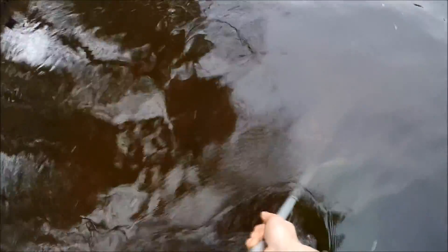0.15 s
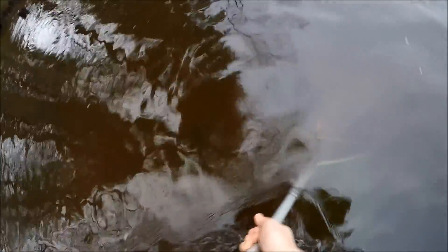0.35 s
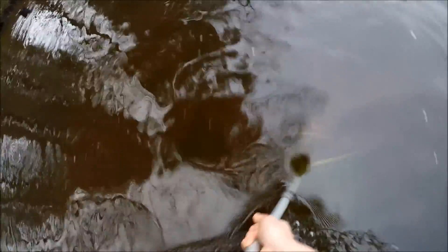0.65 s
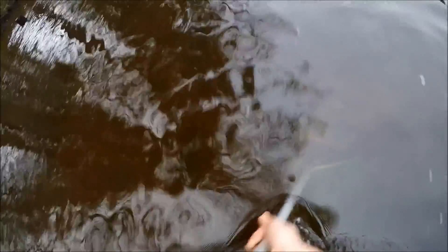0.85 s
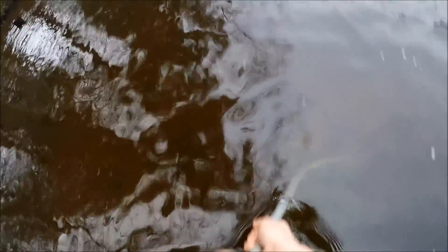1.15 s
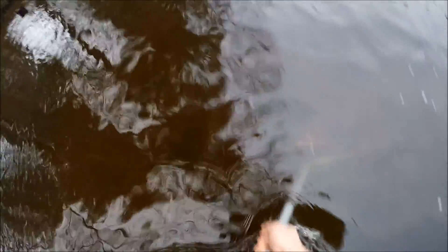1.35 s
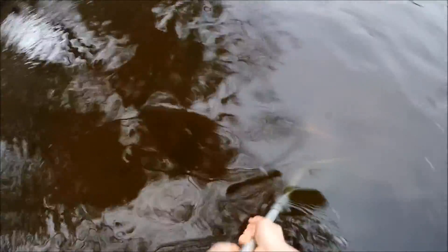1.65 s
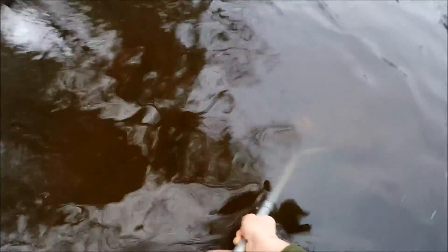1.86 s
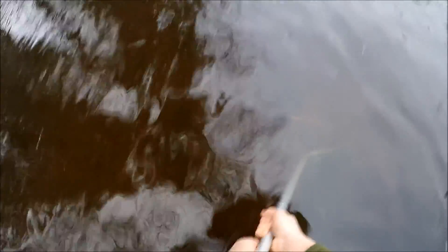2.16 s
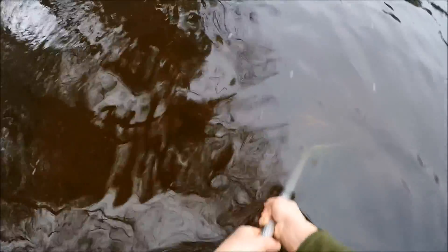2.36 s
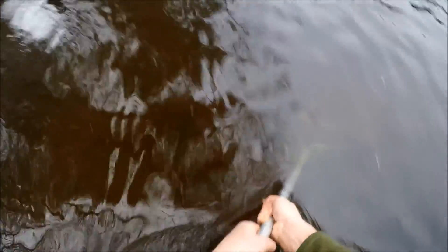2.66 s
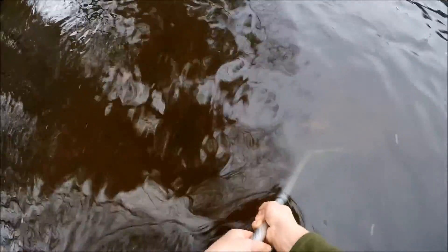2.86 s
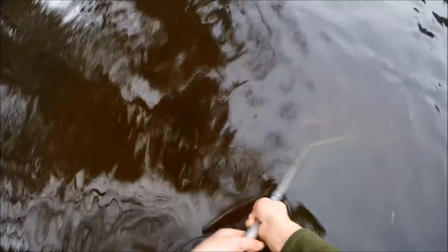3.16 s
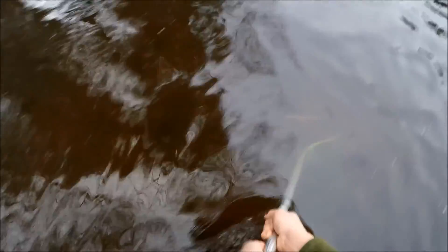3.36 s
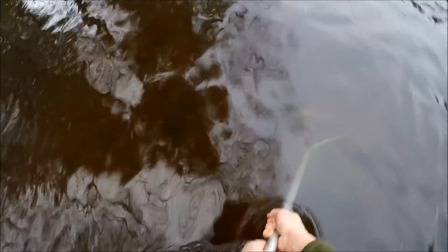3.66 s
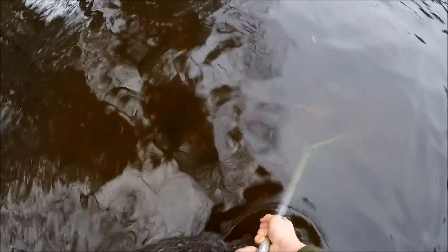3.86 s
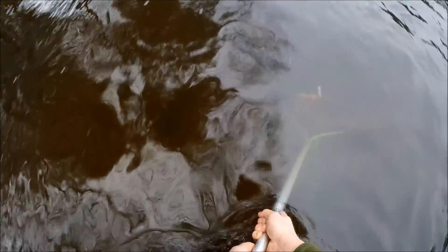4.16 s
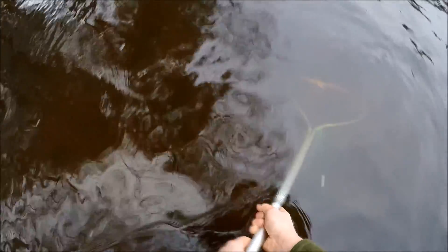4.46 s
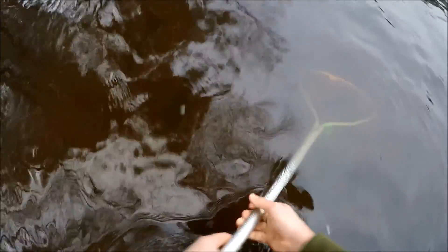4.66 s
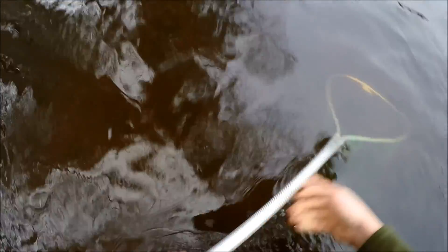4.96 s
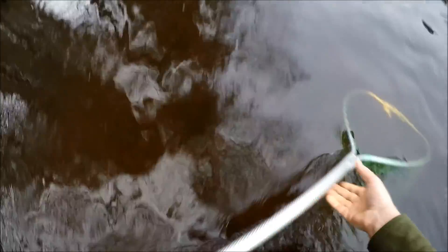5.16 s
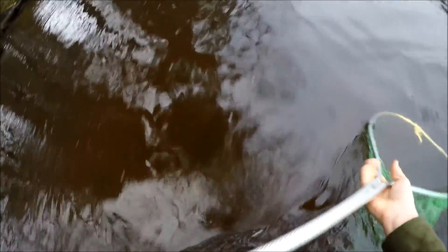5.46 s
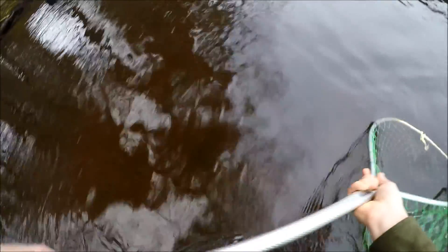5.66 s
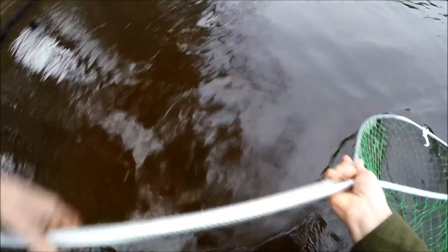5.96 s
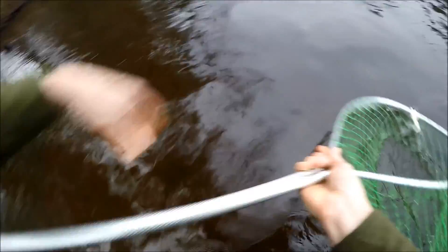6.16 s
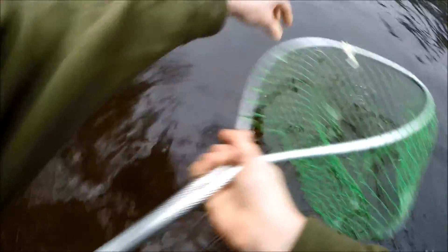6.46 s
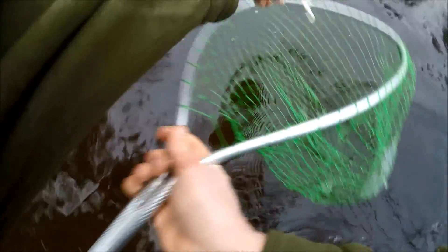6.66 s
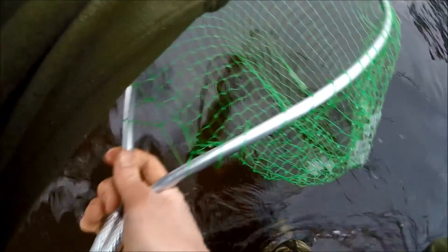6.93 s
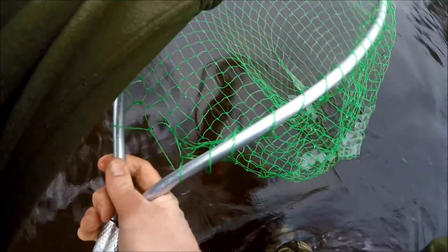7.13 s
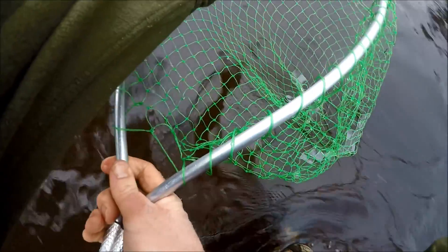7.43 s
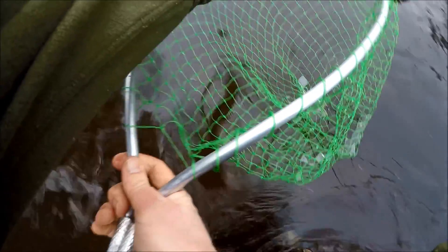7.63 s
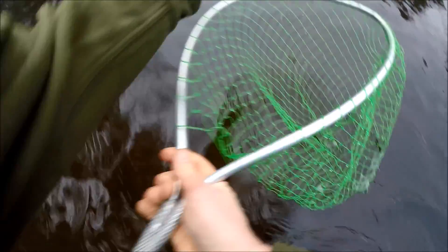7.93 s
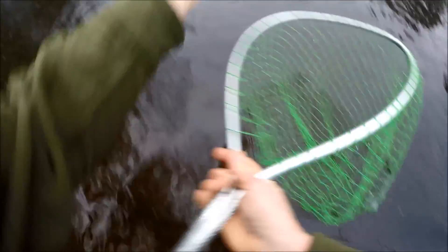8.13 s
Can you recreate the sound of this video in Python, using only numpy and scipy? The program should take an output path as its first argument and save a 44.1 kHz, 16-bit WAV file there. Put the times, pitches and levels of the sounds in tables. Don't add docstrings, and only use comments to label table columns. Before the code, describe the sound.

Very close, boxy handling noise from a sealed microphone on a wading person's chest. Jerky cloth scuffs, crisp snaps, drip taps and tiny ticks come first over low swaying rumble and dull thumps. It thins out, a far bird gives three faint whistles, then knocks cluster as the net is lifted, and a heavy fabric rub follows. It quiets to soft rubbing before final bumps. Soft hiss throughout.

```python
import sys
import numpy as np
from scipy import signal
from scipy.fft import rfft, irfft
from scipy.io import wavfile
from scipy.ndimage import uniform_filter1d

SR = 44100
rng = np.random.default_rng(int(sys.argv[2]) if len(sys.argv) > 2 else 0)


def digitize_waveform(pressure):
    field = np.atleast_2d(pressure).T
    bounded = np.clip(field, -1, 1)
    quanta = np.round(bounded * 32767).astype(np.int16)
    wavfile.write(sys.argv[1], SR, quanta)


def voltage_ratio(level):
    return 10 ** (np.asarray(level, float) / 20)


N = 365677

# (frequency [Hz], level [dB per Hz])
HISS_SPECTRUM = [(35, -4.5), (70, -9), (200, -18.5), (1000, -30.5), (2090, -29.5), (3570, -30), (8820, -39),
                 (15400, -40)]
# (frequency [Hz], level [dB])
WHINES = [(12227, -94), (13675, -95)]
# (time [s], pitch [Hz], level [dB])
BIRD_WHISTLES = [
    [(4.035, 3280, -69), (4.115, 3220, -67), (4.145, 3360, -71)],
    [(4.4, 3330, -70), (4.47, 3450, -69), (4.54, 3500, -70)],
    [(4.575, 3420, -61), (4.63, 3370, -64)],
]
# (time [s], peak level [dB], pitch [Hz], length [s])
TICKS = [(0.0474, -28, 6100, 0.0024), (0.396, -37.5, 3980, 0.0026), (0.76, -30.5, 5500, 0.0052),
         (0.78, -25, 4160, 0.0041), (0.937, -35, 4500, 0.0024), (0.989, -38, 5630, 0.0048),
         (1.459, -38.5, 4320, 0.0033), (1.495, -33.5, 4010, 0.0018), (1.7848, -36, 5380, 0.003),
         (2.074, -33.5, 4040, 0.0048), (2.101, -29, 5270, 0.0048), (2.259, -37.5, 5400, 0.0033),
         (2.291, -42, 4800, 0.003), (2.504, -41.5, 5420, 0.0027), (2.834, -38.5, 4080, 0.0023),
         (2.864, -37.5, 5130, 0.001), (2.969, -40, 6200, 0.0022), (3.27, -44, 6840, 0.0022),
         (3.376, -46, 4100, 0.0026), (3.749, -36.5, 4090, 0.003), (3.887, -46, 5370, 0.003),
         (4.868, -38, 4950, 0.0025), (6.62, -35, 4010, 0.003), (7.133, -32, 5030, 0.0011),
         (5.2127, -27, 3250, .0015), (5.957, -41, 5900, .002), (5.963, -40, 4500, .002),
         (6.14, -42, 8000, .002), (6.32, -33, 3100, .003), (7.6013, -37, 4090, .002),
         (8.0228, -36, 3990, .002)]

# (frequency [Hz], width [Hz], level [dB])
CASE_BODY = [(1060, 200, -0.5), (1384, 216, -3), (1680, 385, 1.5), (2287, 470, -5.5), (2548, 303, 2.5),
             (3062, 880, -3.5), (4088, 394, -8)]
CASE_TOP = [(4890, 81, -2), (4950, 820, 2.5), (5555, 170, -0.5), (6015, 640, 0.5), (6680, 620, -4.5),
            (7510, 840, -11)]
CASE_SHEEN = [(9740, 960, -12.5), (10960, 600, -17.5), (13000, 1700, -19)]
# (frequency [Hz], width [Hz], level [dB])
MOUNT_LOW = [(118, 85, -2.5), (165, 120, -11)]
STRAP = [(271.5, 109.5, 3), (315.8, 61, 2.5), (362, 92, -4)]
SHELL = [(551, 90, -3.5), (712.6, 153, -1), (850, 170, -4), (905, 70, -6)]
# (frequency [Hz], width [Hz], level [dB])
BLOWN_SHELL = [(548, 80, -8), (712, 125, 0), (870, 180, -6)]
BLOWN_CASE = [(1093, 210, 0), (1430, 140, -6), (1800, 220, -5.5), (2600, 300, -14)]

# (time [s], jerk [0-1])
JERK = [
    (0, 1.03),
    (3.9, 1),
    (4.5, 0.35),
    (6.0, .6),
    (8.29, .8),
]

# (time [s], peak level [dB], pitch [Hz], shell level [dB])
CRACKLES = [(.016, -26, 2620, -33), (.7475, -28, 2700, -37.5), (0.787, -25.5, 1920, -60),
            (1.0014, -33, 2580, -57), (1.521, -29.5, 3130, -35), (1.5335, -34, 3070, -39),
            (1.5425, -37, 2840, -55), (1.5547, -36, 3000, -55), (1.893, -30, 1730, -40),
            (2.081, -35, 2270, -55), (3.039, -42, 2530, -52)]
# (time [s], peak level [dB], pitch [Hz], shell level [dB])
DRIPS = [(0.4882, -33, 1690, -45), (1.0232, -22, 1910, -32), (1.1251, -23.5, 1840, -33.5),
         (1.2903, -36, 3040, -54), (1.603, -25.5, 1860, -35), (1.6278, -32, 1800, -39),
         (1.688, -24.5, 1810, -38), (1.713, -31.5, 2900, -34.5), (1.8006, -31.5, 2540, -37),
         (2.0286, -40.5, 2170, -65), (2.169, -29, 3110, -47), (2.585, -38, 2500, -42),
         (2.6075, -33.5, 1540, -51), (3.0757, -32.5, 2470, -37), (4.4582, -40.5, 1590, -67),
         (6.902, -21, 2650, -35), (7.2464, -40.5, 2590, -60), (2.731, -40, 2350, -60),
         (4.62, -37, 1450, -60), (5.886, -41, 2700, -60), (6.018, -40, 1500, -55), (6.072, -36, 1600, -55),
         (8.026, -36, 1100, -40)]

# (time [s], low level [dB], pitch [Hz], strap level [dB], shell level [dB])
KNOCKS = [(.072, -29, 134, -50, -50), (1.792, -37, 93, -39.5, -31), (2.153, -46, 72.7, -40, -34.5),
          (2.194, -25.5, 109, -42.5, -63), (2.351, -31.5, 110, -41, -42.5), (2.739, -18, 131, -46, -26.5),
          (3.531, -40, 153, -42.5, -38.5), (3.65, -28.5, 106, -49.5, -58), (4.9345, -22.5, 125, -45.5, -49),
          (4.96, -41, 127, -48, -50), (5.088, -30, 167, -42, -41), (5.112, -33, 101, -50, -42),
          (5.182, -34.5, 110, -56, -42.5), (5.832, -36, 142, -45, -46.5), (5.925, -32, 72.7, -41.5, -40),
          (5.954, -29, 72.7, -47, -44), (5.983, -21.5, 82.5, -50.5, -42.5), (6.35, -32, 119, -40, -27.5),
          (6.388, -25, 137, -30, -25), (6.541, -36, 165, -30.5, -26), (6.586, -26, 91, -49, -40),
          (6.649, -32, 88.8, -42, -43), (6.903, -31, 210, -50, -45), (7.002, -27.5, 119, -51, -66),
          (5.136, -50, 114, -48, -46), (5.148, -40, 140, -52, -47), (5.198, -45, 120, -54, -44),
          (5.218, -34, 83.4, -58, -43), (5.286, -42, 214, -50, -50), (6.008, -45, 117, -55, -49),
          (6.337, -38, 110, -42, -37)]
# (time [s], low level [dB], pitch
# [Hz], strap level [dB])
MORE_KNOCKS = [(0.628, -38, 119, -62), (.926, -37.5, 123, -50.5), (1.399, -32.5, 125, -60),
               (1.48, -40.5, 114, -55), (1.912, -30.5, 93, -52), (2.172, -33.5, 130, -48), (2.248, -29, 110, -62),
               (2.322, -37, 80, -61), (2.548, -34.5, 147, -53), (2.855, -35.5, 148, -54),
               (3.311, -36.5, 89.5, -53), (3.451, -40, 108, -70), (6.007, -32.5, 117, -53),
               (6.153, -32.5, 110, -53), (6.362, -24.5, 110, -44), (7.022, -38.5, 200, -57),
               (6.6, -30, 86.1, -49), (6.669, -25, 136, -40), (7.879, -36, 114, -66), (8.093, -33, 99.6, -45),
               (8.172, -31, 133, -47)]
# (contact [s], damping [ratio], case level [dB], delay of the push [s])
SHARP_BLOW = (0.001, 1.0, -7, .005)
PADDED_BLOW = (0.008, 1, -15, .006)
LIFT_S = 4.2

# (frequency [Hz], level [dB per Hz])
SWAY_SPECTRUM = [(4.7, -24), (8.0, 11.5), (27, 5.5), (49, -3), (70, -12), (91, -34), (150, -120)]
# (time [s], level [dB])
BODY_SWAY = [(0, -41.5), (.44, -44), (.78, -39), (1.05, -38.5), (1.4, -37), (1.75, -40.5), (2.0, -43.5),
             (2.14, -29.5), (2.47, -40.5), (2.95, -40), (3.2, -42.5), (3.67, -42), (4.36, -55),
             (5.7, -49.5), (5.96, -41), (6.8, -38), (7.1, -48), (8.29, -42)]
# (time [s], level [dB])
DRAG = [(0, -49.5), (.44, -55), (1.33, -54.5), (1.7, -52), (2.47, -51), (3.2, -63), (3.93, -59.5),
        (4.26, -60.5), (4.36, -71), (4.5, -56), (5.3, -52.5), (5.7, -68.5), (6.2, -50), (6.74, -46),
        (6.8, -54), (7.08, -57), (7.65, -52), (8.29, -42)]
# (peak time [s], shake level [dB], length [s], strap share [dB], shell share [dB])
LURCHES = [(0, -51, 0.13, 6, -8), (0.767, -57.5, 0.055, 8, -19), (1.027, -47.5, 0.16, -2, -12),
           (1.424, -39, 0.088, -5, -16), (1.921, -41, 0.091, -12, -17), (2.168, -32, 0.026, -10, -15),
           (2.24, -42.5, 0.091, -16, -29), (2.732, -40.5, 0.13, -7.5, -14),
           (3.073, -39.5, 0.051, -10.5, -9), (3.352, -48.5, 0.12, -5.5, -11.5), (3.56, -52, 0.056, -2, -17),
           (3.672, -47, 0.093, -8, -16), (4.67, -50, .15, -2, -18), (4.786, -57.5, .15, -8, 2),
           (4.93, -56, 0.086, 10, -10), (5.14, -39, 0.1, -4, -7), (5.97, -33.5, .055, -29, -24),
           (6.136, -43.5, 0.041, 1.5, -4), (6.37, -31.5, 0.047, 1, -4), (6.48, -35, 0.2, -4, -12),
           (6.6, -29, 0.06, -11, -15), (6.67, -30, .05, -14, -18), (6.73, -33, .03, -12, -18),
           (6.85, -42, .02, -4, -12), (7.82, -36, 0.04, -18, -20), (7.905, -34, .06, -18, -16),
           (7.96, -44, .02, -4, -8), (8.045, -39, .03, -8, -14), (8.105, -37, .04, -8, -14),
           (8.185, -29, .04, -18, -20), (8.225, -33, .02, -14, -12), (8.272, -29, .04, -20, -24)]

# (time [s], pressure level [dB])
PRESS = [(0, -61), (1.75, -62), (2.0, -68), (2.5, -59), (3.3, -63.5), (4.5, -67), (4.57, -53),
         (4.72, -48.5), (5.5, -54), (5.54, -73), (5.8, -72), (5.98, -57), (6.22, -50), (6.33, -39.5),
         (6.93, -45.5), (7.0, -60), (7.72, -61), (8.29, -46)]
# (peak time [s], level [dB], length [s], crispness [dB])
RUBS = [(0.042, -40, 0.069, -14), (0.163, -47.5, 0.057, -11.5), (0.31, -50, 0.05, -13),
        (0.516, -50, 0.039, -8.5), (0.611, -52.4, 0.045, -11), (0.774, -41.5, 0.057, -12),
        (1.019, -44.5, 0.071, -13), (1.196, -55.5, 0.13, -13), (1.405, -52.5, 0.037, -15),
        (1.537, -53, 0.077, -8), (1.62, -50.5, 0.08, -14), (1.74, -50.5, 0.18, -11.5),
        (1.91, -54, 0.04, -12), (2.11, -52.5, 0.036, -7), (2.163, -43.5, .04, -11.5),
        (2.304, -52, .05, -13), (2.762, -56, 0.038, -14), (3.06, -48, 0.037, -21), (3.125, -49, 0.041, -20),
        (3.388, -53.5, 0.071, -12.5), (3.562, -48, 0.035, -7.5), (3.848, -50.5, 0.04, -16),
        (3.99, -59.5, 0.043, -20), (5.17, -50, 0.17, -10), (7.152, -55.5, 0.13, -34),
        (7.453, -51, 0.16, -18), (7.619, -47, 0.074, -26), (8.022, -46, 0.037, -17),
        (8.166, -47, 0.17, -13), (5.93, -58, .04, -14), (6.075, -57, .03, -14), (6.165, -55, .04, -12),
        (7.87, -50, .14, -14), (6.56, -44, .15, -14)]


def evened(x):
    return x / np.sqrt(np.mean(x ** 2) + 1e-20)


def peak_one(x):
    return x / np.max(abs(x))


def add(mix, s, sound):
    part = mix[max(round(s * SR), 0):][:len(sound)]
    part += sound[:len(part)]


def curves(rows):
    s, *columns = np.transpose(rows)
    return [np.interp(np.arange(N) / SR, s, c) for c in columns]


def shaped(points):
    f, db = np.transpose(points)
    hz = np.fft.rfftfreq(N, 1 / SR)
    gain = voltage_ratio(np.interp(np.log(hz + 1), np.log(f + 1), db))
    return evened(irfft(rfft(rng.standard_normal(N)) * gain, N))


def ring(x, modes):
    out = np.zeros(len(x))
    for k, (hz, width, db) in enumerate(modes):
        b, a = signal.iirpeak(hz, hz / width, SR)
        once = signal.lfilter(b, a, x)
        out += (-1) ** k * voltage_ratio(db) * signal.lfilter(b, a, once)
    return out


def flicker(seconds, db):
    wander = evened(uniform_filter1d(rng.standard_normal(N), max(int(seconds * SR), 1)))
    return voltage_ratio(db * curves(JERK)[0] * wander)


def fibres(per_s, spread_db, share):
    size = voltage_ratio(spread_db * np.minimum(rng.exponential(1, N), 5))
    slips = rng.choice([-1., 1.], N) * size
    slips *= rng.random(N) < per_s / SR
    share = np.clip(share * curves(JERK)[0], 0, 1)
    friction = (1 - share) * rng.standard_normal(N)
    return (friction + share * evened(slips)) / np.hypot(share, 1 - share)


def patchy(drive, modes, seconds, db):
    out = np.zeros(N)
    for k, mode in enumerate(modes):
        out += (-1) ** k * ring(drive * flicker(seconds, db), [mode])
    return evened(out)


def strokes(s, db, length, rise):
    coarse = np.arange(0, N, 128)
    t = coarse[:, None] / SR - s
    fall = np.where(t < 0, -t / rise, t) / np.maximum(length, .01)
    power = (voltage_ratio(db - 10 * fall) ** 2).sum(axis=1)
    return np.interp(np.arange(N), coarse, np.sqrt(power))


def bird():
    out = np.zeros(N)
    for rows in BIRD_WHISTLES:
        s, hz, db = np.transpose(rows)
        t = np.arange(s[0], s[-1], 1 / SR)
        tone = np.sin(2 * np.pi * np.cumsum(np.interp(t, s, hz)) / SR)
        level = np.sqrt(2) * voltage_ratio(np.interp(t, s, db))
        add(out, s[0], level * tone * signal.windows.tukey(len(t), .3))
    return out


def ticks():
    out, t = np.zeros(N), np.arange(1500) / SR
    chance = rng.standard_normal((len(TICKS), len(t)))
    for (s, db, hz, length), grit in zip(TICKS, chance):
        fizz = ring(grit, [(hz, 0.32 * hz, 0), (12000, 5000, -31)])
        fizz = fizz * t * np.exp(-t / max(length, .0005))
        add(out, s, voltage_ratio(db - 7.5) * peak_one(fizz))
    return out


def snaps():
    out, t = np.zeros(N), np.arange(1200) / SR
    crackle_edge_db, drip_edge_db = -12, -40
    rows = [(*row, crackle_edge_db) for row in CRACKLES] + [(*row, drip_edge_db) for row in DRIPS]
    chance = rng.standard_normal((len(rows), len(t)))
    for (s, db, hz, shell_db, edge_db), grit in zip(rows, chance):
        crack = grit * np.exp(-t / 0.0021)
        tone = np.sin(2 * np.pi * hz * t * (1 + 3.9 * t)) * np.exp(-t / 0.0042)
        body = 0.55 * tone + .55 * peak_one(ring(crack, [(1650, 1500, 0), (3200, 2000, -2)]))
        edge = peak_one(ring(crack, [(4500, 490, 0.4), (5960, 2800, -2.4)]))
        shell = peak_one(ring(crack, [(600, 820, 0)]))
        sound = voltage_ratio(db + 0.04) * body + voltage_ratio(db + edge_db) * edge
        add(out, s, sound + voltage_ratio(shell_db + 2.5) * shell)
    wall = signal.butter(4, 7200, fs=SR, output="sos")
    return signal.sosfilt(wall, out)


def thumps():
    out, t = np.zeros(N), np.arange(3000) / SR
    common_shell_db = -20.5
    blows = KNOCKS + [(*row, row[1] + common_shell_db) for row in MORE_KNOCKS]
    chance = rng.standard_normal((len(blows), 900))
    for (s, db, hz, strap_db, shell_db), grit in zip(blows, chance):
        contact, damping, case_db, crest = SHARP_BLOW if s < LIFT_S else PADDED_BLOW
        blow = np.zeros(len(t))
        blow[:900] = (1 + .7 * grit) * np.exp(-t[:900] / contact)
        swell = (t / crest * np.exp(1 - t / crest)) ** 3.54
        push = np.cos(2 * np.pi * hz * (t - crest)) * swell
        rung = []
        for modes in (STRAP, BLOWN_SHELL, BLOWN_CASE):
            damped = [(f, width * damping, d) for f, width, d in modes]
            rung.append(peak_one(ring(blow, damped)))
        strap, shell, case = rung
        sound = voltage_ratio(db + 4.5) * push + voltage_ratio(strap_db + 8.0) * strap
        add(out, s, sound + voltage_ratio(shell_db + 6.5) * (shell + voltage_ratio(case_db) * case))
    soft = signal.butter(2, 3000, fs=SR, output="sos")
    return signal.sosfilt(soft, out)


def mount():
    steady = voltage_ratio(curves(DRAG)[0])
    s, db, length, strap_db, shell_db = np.transpose(LURCHES)

    def pulled(base_db, share_db):
        return np.hypot(voltage_ratio(base_db) * steady, strokes(s, db + share_db, length, 0.64))

    drag = fibres(300, 2.5, 0.32) * flicker(0.037, 3.0)
    sway = voltage_ratio(curves(BODY_SWAY)[0] + 3.0) * shaped(SWAY_SPECTRUM) * flicker(.08, 2.3)
    low = voltage_ratio(0.43) * pulled(0, 0) * evened(ring(drag, MOUNT_LOW))
    strap = voltage_ratio(-1.5) * pulled(-14, strap_db) * evened(ring(drag, STRAP))
    scuffed = drag * flicker(0.014, 0.57)
    shell = voltage_ratio(-2.0) * pulled(-11.5, shell_db) * evened(ring(scuffed, SHELL))
    return sway + low + strap + shell


def cloth():
    press_db = curves(PRESS)[0]
    s, db, length, crisp_db = np.transpose(RUBS)
    rise = 0.85
    rub = np.hypot(voltage_ratio(press_db), strokes(s, db, length, rise))
    steady_crisp = voltage_ratio(press_db - 12 - 0.15 * (press_db + 52.5))
    crisp = np.hypot(steady_crisp, strokes(s, db + crisp_db, length, rise))
    drive = fibres(900, 5.75, 0.32) * flicker(.012, 1.56)
    body = patchy(drive, CASE_BODY, .02, 2.4)
    top = patchy(drive, CASE_TOP, 0.0077, 1.6) + voltage_ratio(-14.5) * evened(ring(drive, CASE_SHEEN))
    shell = voltage_ratio(-10) * evened(ring(drive, SHELL)) + voltage_ratio(-12.0) * evened(ring(drive, STRAP))
    return voltage_ratio(0.76) * rub * (body + shell) + voltage_ratio(-0.55) * crisp * top


def scene():
    return (bird() + ticks() + snaps() + thumps() + mount() + cloth())[None]


def roll_off(x):
    return signal.sosfilt(signal.butter(12, 15580, fs=SR, output="sos"), x)


def record(dry):
    t = np.arange(N) / SR
    whine = sum(voltage_ratio(db) * np.sin(2 * np.pi * hz * t) for hz, db in WHINES)
    hiss = voltage_ratio(-58.5) * shaped(HISS_SPECTRUM)
    edge = signal.ellip(10, .1, 80, 15330, fs=SR, output="sos")
    wet = signal.sosfilt(edge, dry + hiss + whine)
    wet = wet * np.minimum((N - np.arange(N)) / 300, 1)
    return roll_off(wet)


dry = scene()
out = record(dry)
digitize_waveform(out)
```